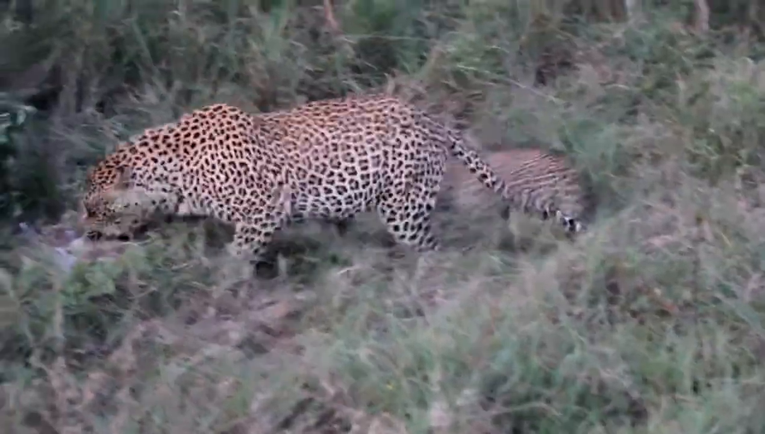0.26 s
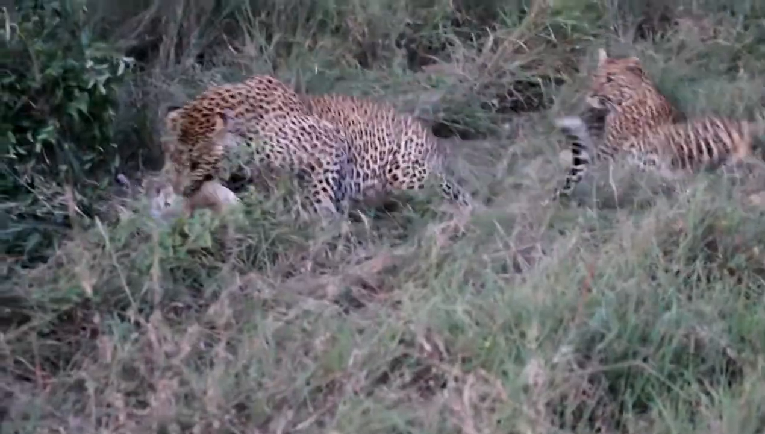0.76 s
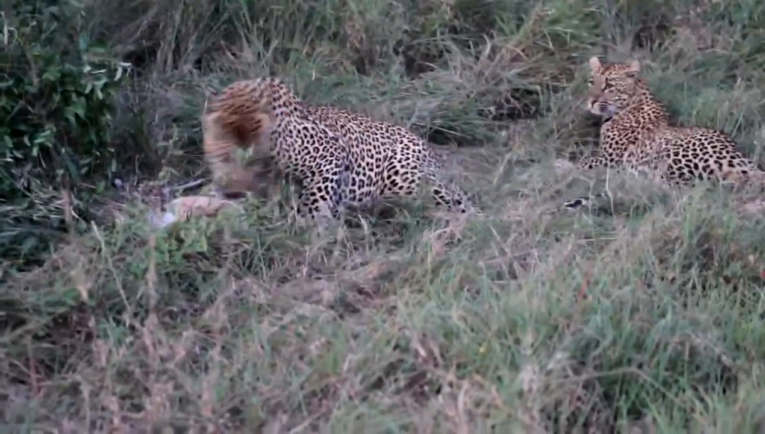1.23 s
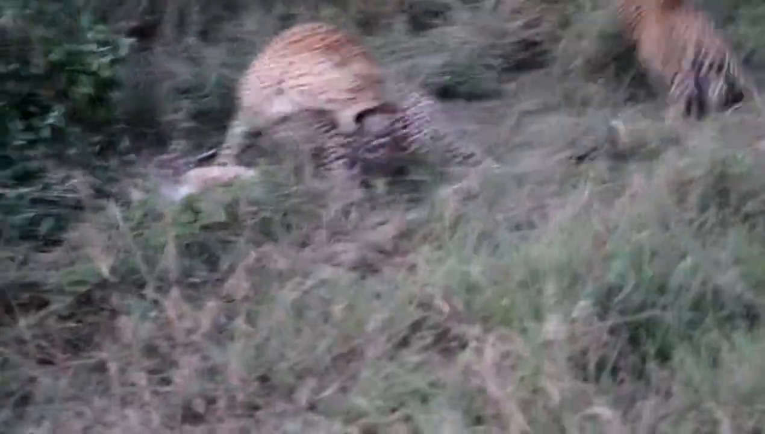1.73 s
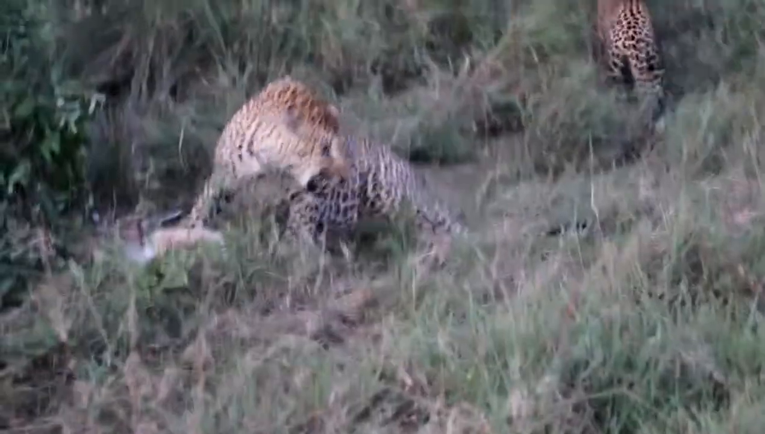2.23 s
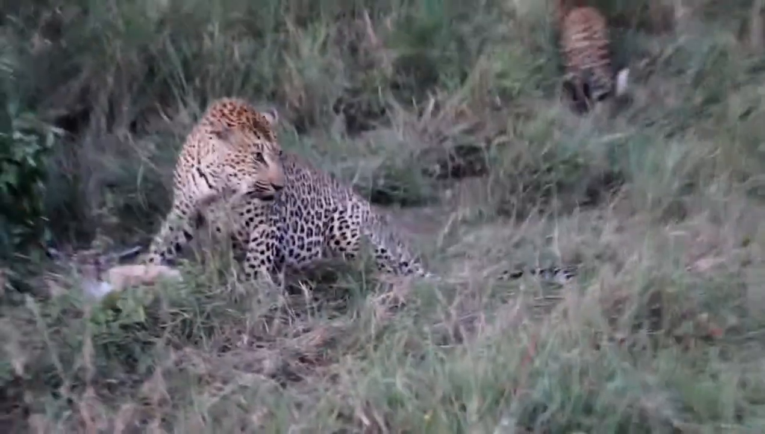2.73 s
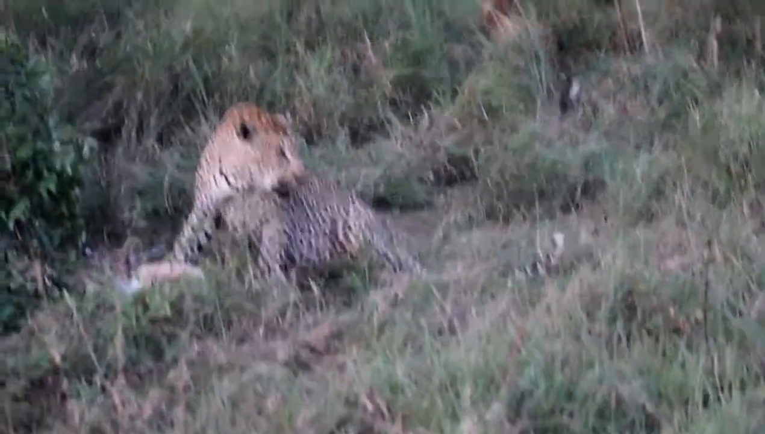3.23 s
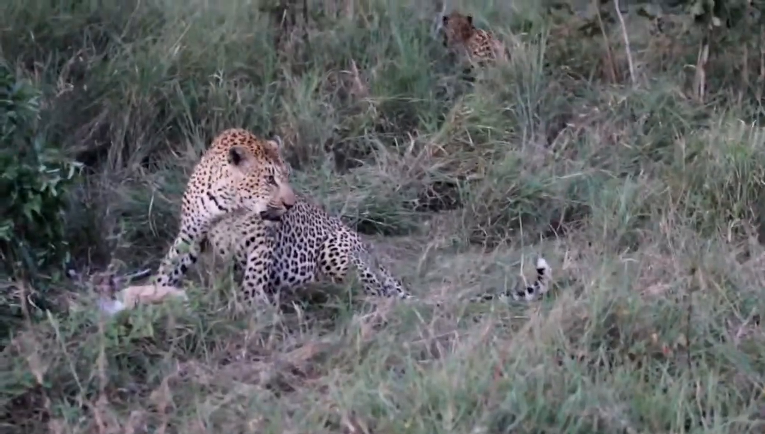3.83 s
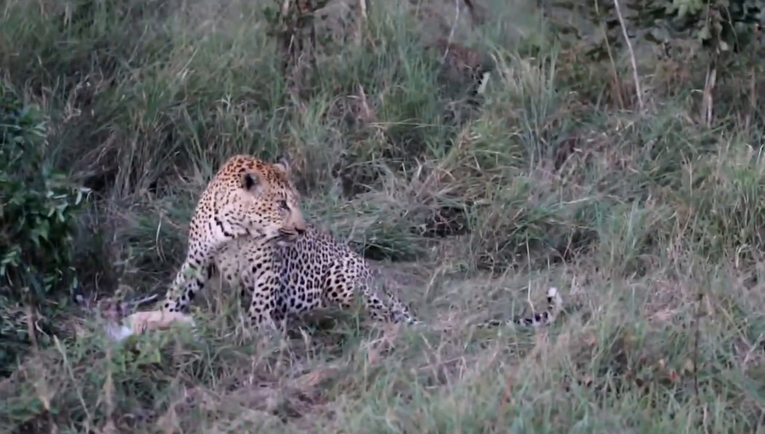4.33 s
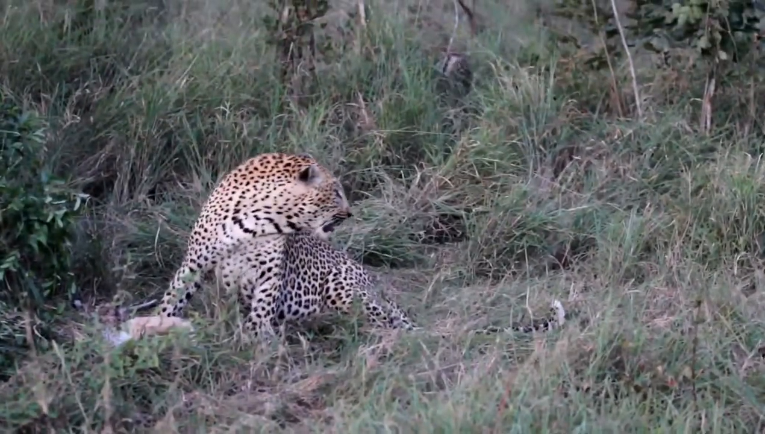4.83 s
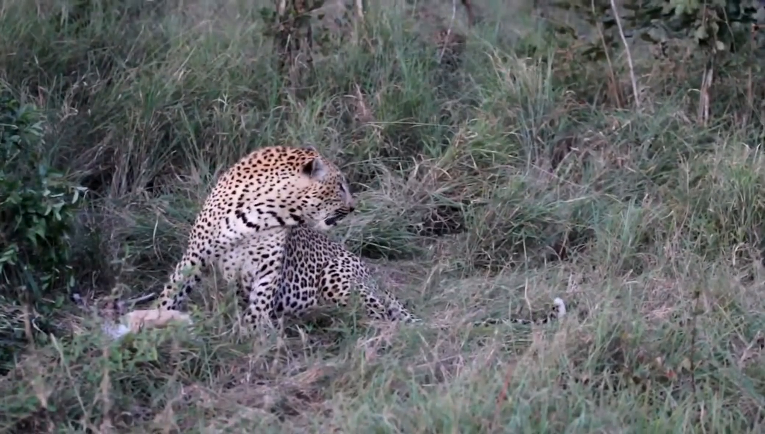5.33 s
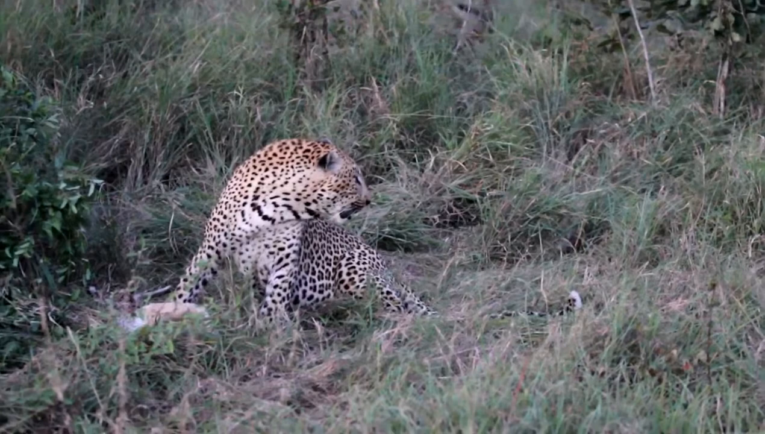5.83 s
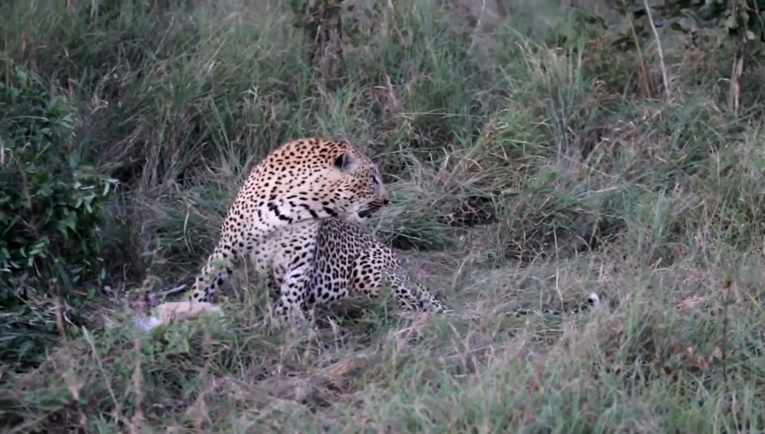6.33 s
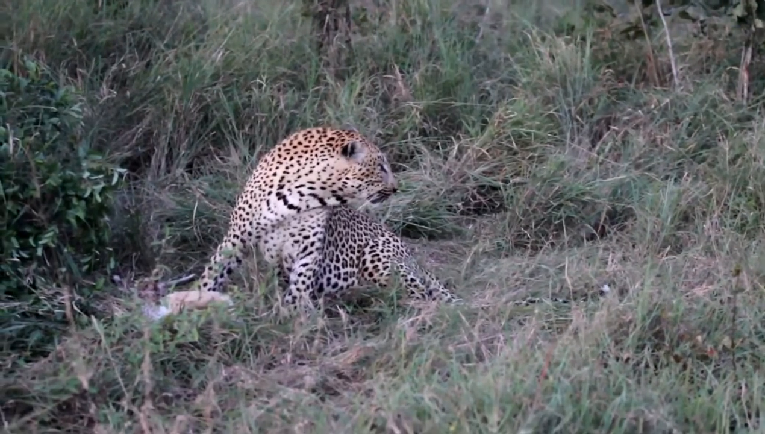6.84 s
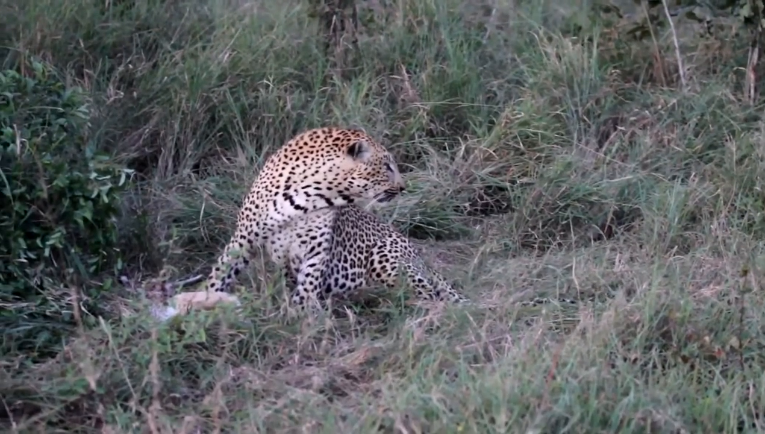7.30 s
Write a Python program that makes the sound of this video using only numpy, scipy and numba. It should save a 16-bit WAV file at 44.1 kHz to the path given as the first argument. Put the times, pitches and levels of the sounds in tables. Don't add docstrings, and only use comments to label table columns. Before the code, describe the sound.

Two leopards a few metres away snarl in quick succession, loud, hoarse and full of breath, while grass hisses around them. After about two and a half seconds the growls become cleaner, deeper and slower, with separate throaty pulses audible. Pauses open between them and they fade out. Dry stalks snap sharply in the second half. Outdoors, a quiet low hum and soft wind sit behind; close mono pickup, almost no echo.

```python
import sys
import numpy as np
from scipy import signal
from scipy.io import wavfile
from scipy.ndimage import uniform_filter1d
from numba import njit

SR = 44100
rng = np.random.default_rng(int(sys.argv[2]) if len(sys.argv) > 2 else 0)


def to_wav(sig):
    pcm = np.clip(np.atleast_2d(sig), -1, 1) * 32767
    pcm = np.round(pcm).astype(np.int16)
    wavfile.write(sys.argv[1], SR, pcm.T)


def how_loud(loudness_db):
    steps = np.asarray(loudness_db, float) / 20
    return 10 ** steps


N = 333748

# (first slap [s], length [s], first gap between slaps [ms],
# lengthening of each gap [ms], breath share [0-1])
GROWLS = [(.005, .23, 30, -1, .45), (.268, .305, 36, -1.2, .6), (.609, .255, 28, 0, .75),
          (.913, .047, 60, 0, .65), (.96, .22, 25, 1.5, .65), (1.236, .174, 24, 0, .55),
          (1.41, .32, 35, 0, .5), (1.795, .125, 36, 2, .65), (1.92, .225, 30, 0, .65),
          (2.19, .216, 30, 2, .25), (2.406, .185, 41, 8, .2), (2.623, .131, 39, 0, .12),
          (2.754, .36, 47, .3, .12), (3.249, .104, 35, 0, .4), (3.353, .31, 37.3, 0, .4),
          (3.746, .375, 39.5, 1.5, .12), (4.121, .19, 65, 9, .08), (4.763, .085, 36, 0, .15),
          (4.914, .303, 33, 3.6, .06), (5.217, .37, 48, 5, .04), (5.962, .085, 39, 0, .04),
          (6.12, .21, 38, 4, .15), (6.359, .12, 54, 0, .06)]


def curve(table, column):
    rows = np.array(table)
    return np.interp(np.arange(N) / SR, rows[:, 0], rows[:, column])


@njit
def svf(x, hz, width):
    y = np.empty(len(x))
    band, low, g, damping = 0., 0., 0., 0.
    for i in range(len(x)):
        if i % 16 == 0:
            g = np.tan(np.pi * hz[i] / SR)
            damping = width[i] / hz[i]
        v = (band + g * (x[i] - low)) / (1 + g * (g + damping))
        band = 2 * v - band
        low = low + 2 * g * v
        y[i] = damping * v
    return y


def ring(x, hz, width, steep=8.7):
    hz = np.clip(hz, 20, 18000) * np.ones(N)
    width = width * np.ones(N)
    once = svf(x + 1e-18, hz, width)
    return svf(once, hz, steep * width) * np.sqrt(SR / (np.pi * width))


def walk(rate):
    hold = int(SR / rate)
    steps = np.repeat(rng.standard_normal(N // hold + 1), hold)
    return 1.8 * uniform_filter1d(uniform_filter1d(steps, hold), hold)[:N]


def land():
    # (frequency [Hz], level per Hz [dB])
    hum = [
        (18, -29),
        (30, 2.5),
        (103, -5.5),
        (218, -16),
        (1430, -15.5),
        (1730, -19),
        (5200, -22.5),
        (6760, -59),
        (11400, -120),
    ]
    # (time [s], level [dB])
    swish = [
        (2.4, -55.5),
        (3.4, -56),
        (4.05, -56.5),
        (5.11, -51.5),
        (5.48, -55.5),
        (6.6, -54.5),
        (7.57, -58),
    ]
    swish_db = curve(swish, 1) - swish[-1][1]
    hz_at, db_at = np.transpose(hum)
    out = 0
    for hz in 35 * 2 ** np.arange(0, 7.6, .4):
        db = np.interp(np.log(hz), np.log(hz_at), db_at) + 10 * np.log10(hz)
        db = db + min(hz / 500, 1) * swish_db + 1.4 * walk(4.164)
        out = out + how_loud(db) * ring(rng.standard_normal(N), hz, hz / 3, steep=2.6)
    out *= how_loud(-56.5) / np.std(out[-SR // 2:])
    passing = np.exp(-((np.arange(N) / SR - 7) / 0.5) ** 4)
    return out + how_loud(-68.5) * passing * ring(rng.standard_normal(N), 1406, 220)


def snaps():
    # (time [s], peak level [dB], centre frequency [Hz])
    stalks = [(2.702, -40, 2560), (4.3294, -46, 10900), (4.568, -29.5, 4450), (4.78, -36, 3720),
              (5.0925, -26.5, 4460), (5.313, -32, 3770), (5.742, -35, 11000), (6.1067, -30, 4490),
              (6.4012, -32.5, 4140), (6.6848, -31, 12600), (7.1536, -32, 6860), (7.2482, -27.5, 12800),
              (7.2697, -25.5, 11500)]
    out, t = np.zeros(N), np.arange(3000) / SR
    for s, db, hz in stalks:
        burst = rng.standard_normal(len(t)) * (np.exp(-t / .0006) + .25 * np.exp(-t / .013))
        band = signal.butter(1, [min(hz, 7000) / 4.8, min(hz * 1.3, 16000)], "band", fs=SR)
        burst = signal.lfilter(*band, burst)
        start = int(s * SR)
        out[start:start + len(t)] += how_loud(db) * burst / np.abs(burst).max()
    return out


def grass(rasp, breath):
    # (time [s], level [dB])
    stir = [
        (0, -56),
        (.9, -57),
        (1.2, -61),
        (1.42, -55),
        (2.6, -56),
        (4.45, -58),
        (5, -55),
        (6.7, -60),
        (7.05, -65),
        (7.57, -65),
    ]
    # (middle [s], half length [s], hiss level [dB], rustle over hiss [dB])
    brushes = [(0.218, 0.04, -48.5, 3), (0.336, .04, -53, 8.5), (0.582, 0.12, -54.5, 4.5),
               (1.277, 0.037, -50, 10), (1.813, 0.059, -55.5, 0), (2.055, 0.03, -54, 3),
               (2.407, 0.13, -56.5, 0), (3.174, 0.065, -61, -4), (4.23, 0.095, -59.5, 0),
               (5.09, 0.1, -66, 9), (5.328, 0.021, -55.5, 10), (6.117, 0.033, -64.5, 11),
               (6.685, 0.011, -60, 2), (7.153, 0.062, -60, 10), (7.276, .03, -52, 5)]
    grains = how_loud(3.0 * rng.exponential(size=N // 60 + 1)).repeat(60)[:N]
    grains = (0.75 + 0.18 * grains) * rng.standard_normal((4, N))
    t = np.arange(N) / SR
    bed = how_loud(curve(stir, 1))
    high = bed + how_loud(-7.5) * breath
    low = how_loud(2.5) * bed + how_loud(-11.5) * breath
    for s, half, db, rustle_db in brushes:
        side = np.where(t < s, 0.84 * half, 0.98 * half)
        brush = how_loud(db) * np.exp(-((t - s) / side) ** 2)
        high += brush
        low += how_loud(rustle_db) * brush
    hiss = ring(grains[0] * (1 + 0.35 * rasp), 12330, 6200, steep=6.2) * high * how_loud(1.1 * walk(37) + 5.5)
    rustle = 0
    for k, hz in ((1, 3370), (2, 6300), (3, 9170)):
        flicker = how_loud((0.7 + 6.3 * rasp) * walk(45))
        rustle = rustle + ring(grains[k] * (1 + 0.078 * rasp), hz, 3250, steep=3.1) * flicker
    return hiss + rustle * low * how_loud(-7.0)


def breaths():
    # (effort at start [dB], at end [dB], mouth opening at start [dB], at end [dB])
    push = [(-31.5, -30, -17, -16.5), (-41.5, -29.5, -0.5, -1.5), (-30.5, -38.5, 1, -8.5),
            (-31.5, -44.5, -5, -7), (-34.5, -32.5, 1.5, -1), (-34, -33.5, -0.5, -7),
            (-29.5, -34.5, -6, -11.5), (-43, -46, -4, 6.5), (-47.5, -39, 4, 0), (-29.5, -43.5, -11, -12),
            (-36.5, -47.5, -10.5, -8.5), (-41.5, -45, -10.5, -7.5), (-46.5, -44.5, -4, -23),
            (-29, -55.5, -8, -21), (-44, -35, -15, -19), (-31, -42.5, -7.5, -9.5), (-41.5, -59, -18, -23),
            (-41, -47, -20.5, -14), (-30, -43.5, -7.5, -12), (-34, -54, -10, -17), (-45.5, -37, -20, -19),
            (-37, -53.5, -7, -16), (-40.5, -55, -11.5, -7)]
    lead_s, attack_s, release_s = 0.042, 0.028, 0.036
    effort, opening = np.full(N, -88.), np.full(N, -30.)
    share, along, which = np.zeros(N), np.zeros(N), np.zeros(N, int)
    start, length = np.transpose(GROWLS)[:2]
    pause = np.r_[start[1:] - (start + length)[:-1] > .015, True]
    for k, ((s, span, _, _, breath), (db0, db1, open0, open1)) in enumerate(zip(GROWLS, push)):
        fresh = k > 0 and pause[k - 1]
        j = np.arange(max(int((s - lead_s * fresh - .005) * SR), 0), int((s + span) * SR))
        t = j / SR - s
        rise = np.clip((attack_s * breath - .004 - t) / (attack_s * breath + lead_s), 0, 1)
        fall = np.clip(1 - (span - t) / release_s, 0, 1)
        edge = fresh * rise + pause[k] * fall
        along[j[0]:], which[j[0]:] = 1, k
        along[j] = np.clip(t / span, 0, 1)
        effort[j] = db0 + (db1 - db0) * along[j] - 14.5 * edge
        opening[j] = open0 + (open1 - open0) * along[j] - 10 * edge
        share[j] = breath + fresh * 0.23 * (1 - breath) * np.exp(-(t + lead_s) / 0.073)
    return effort, opening, share, along, which


def folds(share):
    # (time [s], level over an ordinary slap [dB])
    hard_slaps = [(.304, 9.5), (.487, 4.5), (.513, 1), (1.213, 8), (1.55, 5.5), (1.831, 12.5), (1.871, 12),
                  (2.076, 9), (2.225, 5), (2.703, 8), (2.754, 15), (2.8, 4), (3.613, -11), (3.867, -3),
                  (4.946, -6)]
    slaps, puff, k = np.zeros(N), np.zeros(N), np.arange(16)
    for s, span, gap_ms, longer_ms, breath in GROWLS:
        late, strength = rng.standard_normal((len(k), 2)).T
        gap = (gap_ms + longer_ms * k) / 1000
        after = np.cumsum(gap) - gap
        keep = after < span - .03
        at = ((s + after + breath * 0.00399 * late) * SR).astype(int)[keep]
        slaps[at] = (np.sqrt(SR * gap) * how_loud(1.2 * strength))[keep]
        puff[at] = how_loud(1.6 * strength)[keep]
    for s, db in hard_slaps:
        slaps[int(s * SR)] += how_loud(db) * np.sqrt(SR / 30)
        puff[int(s * SR)] += how_loud(db - 10.5)
    fade = np.exp(-1 / (0.014 * SR))
    puff = signal.lfilter([1], [1, -fade], puff)
    puff = uniform_filter1d(puff, size=180, origin=89) + .16 + .22 * share
    return slaps, 1.883 * puff


def leopards():
    # (chest [Hz], jaw [Hz], low throat [Hz], high throat [Hz], throat glide over the growl [%])
    tract = [(111, 443, 807, 1104, 1), (123, 283, 762, 1095, 1), (132, 440, 922, 1190, 6),
             (125, 320, 900, 1140, -2), (109, 245, 775, 1093, -12), (120, 300, 888, 1080, -2),
             (118.5, 436, 837, 1133, -2), (122, 270, 830, 1000, -6), (120, 290, 755, 960, -4),
             (109.3, 400, 810, 1070, 6), (102, 360, 850, 1095, -4), (142, 404, 870, 1500, -0.5),
             (157.5, 420, 700, 1120, 0), (151, 326, 656, 990, -1), (144, 290, 785, 990, 8.5),
             (157, 405, 673, 1090, -1.5), (147, 430, 730, 1600, 0), (166, 450, 740, 1080, 2),
             (170, 462, 766, 1100, -3), (167.7, 451, 760, 1152, -1), (167, 414, 740, 1063, 0),
             (173, 414, 706, 1080, 2), (178, 300, 694, 1150, 1)]
    # (high throat over low [dB], mouth [dB], jaw over chest [dB], mouth tilt [dB per octave])
    colour = [(0.5, -2, -9, -2.5), (-9, -6, -2, -5), (-2.5, -3, -5.5, -0.5), (-15, -6, -15, -11),
              (-12.5, -6, -2.5, 0.5), (-8, -3.5, -11, 3.5), (-2, -3, -6, -5.5), (-10, -4, -1.5, -8.5),
              (-22, -2, -5, -6.5), (3, -1, -7.5, -1.5), (3.5, -6.5, -15, 3.5), (-3, -3, -12, -4),
              (-3.5, -5.5, -13, -3), (-8, -8.5, -21, -8.5), (-8, -3.5, -18, -7.5), (-8.5, -8, -15, -5),
              (-18, -3, -20, 6), (-10, 4.5, -18, 6), (-15, -11.5, -13.5, -1.5), (-8, -11.5, -22.5, -3),
              (-15, -2.5, -17, -4), (-4, -5.5, -13, -7), (-18, -8.5, -22, -8)]
    # (frequency [Hz], width [Hz], level [dB])
    mouth_modes = [(1407, 120, -7), (1737, 144, 2.5), (1969, 106, 3), (2293, 110, -5.5), (2760, 400, 2),
                   (3280, 124, 0.5), (3710, 270, -0.5), (4340, 210, -0.5), (4830, 310, -6.5),
                   (5430, 200, -5.5), (6080, 1100, -3.5), (7640, 1600, -2.5)]
    effort, opening, share, along, which = breaths()
    slaps, puff = folds(share)
    chest_hz, jaw_hz, low_hz, high_hz, glide = uniform_filter1d(np.transpose(tract)[:, which], size=1800)
    high_db, mouth_db, jaw_db, tilt_db = uniform_filter1d(np.transpose(colour)[:, which], size=1800)
    low_hz = low_hz * uniform_filter1d(1 + glide / 50 * (along - .5), size=1800)
    high_hz = high_hz * uniform_filter1d(1 + 0.2 * glide / 50 * (along - .5), size=1800)

    def force(db):
        return how_loud(uniform_filter1d(effort + db, size=300))

    chest_force, low_force = force(0), force(opening)
    high_force = force(high_db + 1.3 * opening)
    mouth_force = force(mouth_db + 0.76 * opening)

    crackle = (rng.random(N) < 400 / SR) * how_loud(2.5 * rng.exponential(size=N).clip(0, 2))
    crackle = crackle * rng.choice([-1, 1], N)
    crackle /= np.std(crackle)

    def drive(strength, airy, fleck_db):
        mix = np.clip(share ** airy, 0, 1)
        eddies = puff * (.75 * rng.standard_normal(N) + .65 * crackle)
        return strength * how_loud(fleck_db * walk(35)) * (np.sqrt(1 - mix) * slaps + np.sqrt(mix) * eddies)

    low = drive(chest_force, airy=1.3, fleck_db=.8)
    wobble = 1 + 0.0052 * walk(24.88)
    body = ring(low, chest_hz * wobble, 25 + 38 * share, steep=2.1)
    body += how_loud(-4.5 - 14.0 * share) * ring(low, 89, 44, steep=0.74)
    body += share ** 1.99 * ring(drive(chest_force, airy=0.17, fleck_db=2.0), 221, 66, steep=7.7)
    jaw = drive(chest_force, airy=0.68, fleck_db=2.5)
    body += how_loud(jaw_db) * ring(jaw, jaw_hz * wobble, 40 + 60 * share, steep=3.6)
    low_throat = drive(low_force, airy=0.47, fleck_db=2.5)
    throat = ring(low_throat, low_hz * wobble, 50 + 70 * share, steep=4.4)
    high_throat = drive(high_force, airy=0.17, fleck_db=1.0)
    throat -= ring(high_throat, high_hz * wobble, 30 + 60 * share, steep=4.8)

    slide = (low_hz / 820) ** 0.19
    widen = how_loud(.9 * tilt_db + 1.5)
    mouth, power = 0, 0
    for k, (hz, width, db) in enumerate(mouth_modes):
        gain = how_loud(db + tilt_db * np.log2(hz / 2000) + 1.33 * walk(9))
        moving_hz = hz * slide * (1 + 0.01 * walk(6))
        air = drive(mouth_force, airy=0.14, fleck_db=2.5)
        mouth = mouth + (-1) ** k * gain * ring(air, moving_hz, width * widen, steep=5.6)
        power = power + gain ** 2
    mouth /= np.sqrt(power)
    cats = how_loud(-3.5) * body + how_loud(-2.0) * throat + how_loud(0.5) * mouth
    rasp = np.tanh(puff * share)
    breath = mouth_force * puff / 1.64 * share ** 1.24 * how_loud(1.4 * tilt_db)
    return cats, rasp, breath


def scene():
    cats, rasp, breath = leopards()
    t = np.arange(6000) / SR
    smear = rng.standard_normal(len(t)) * np.exp(-t / 0.038) * (t > .004)
    low_down = cats + how_loud(-37) * signal.fftconvolve(cats, smear)[:N]
    lag = int(.00076 * SR)
    dull = signal.lfilter(*signal.butter(1, 1200, fs=SR), low_down)
    low_down[lag:] += .68 * dull[:-lag]
    return (low_down + land() + grass(rasp, breath) + snaps())[None]


def low_pass(x):
    return signal.sosfilt(signal.butter(12, 16320, fs=SR, output="sos"), x)


def record(dry):
    thin = signal.sosfilt(signal.butter(2, 40, "high", fs=SR, output="sos"), dry)
    thin = signal.sosfilt(signal.ellip(10, .3, 70, 15800, fs=SR, output="sos"), thin)
    return low_pass(thin)


dry = scene()
out = record(dry)
to_wav(out)
```